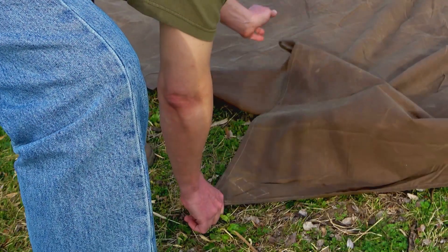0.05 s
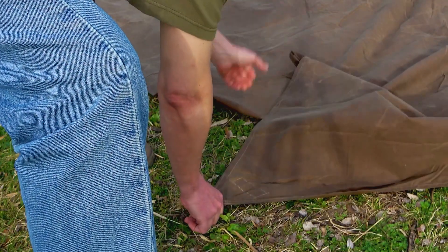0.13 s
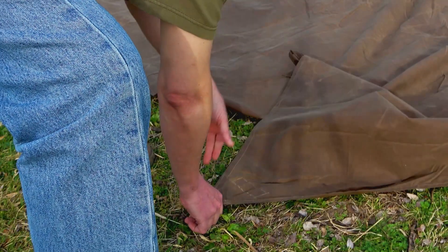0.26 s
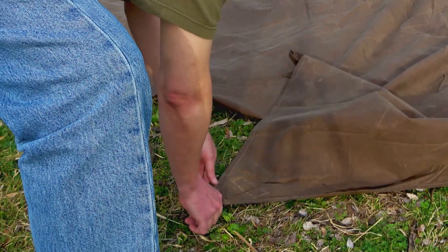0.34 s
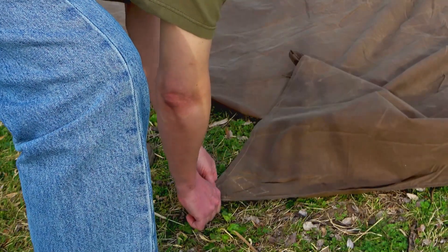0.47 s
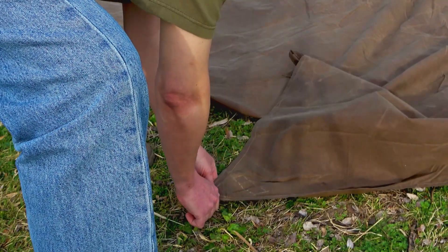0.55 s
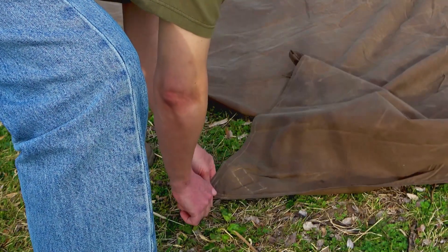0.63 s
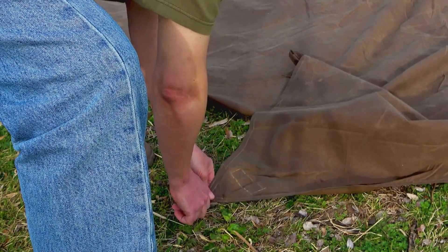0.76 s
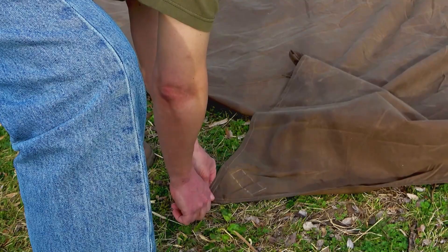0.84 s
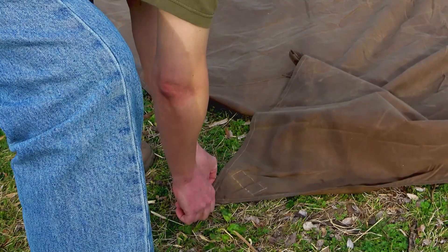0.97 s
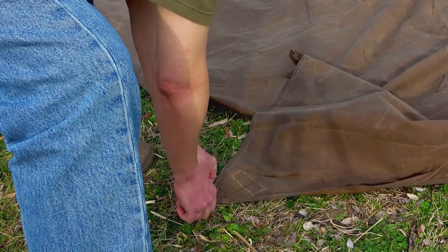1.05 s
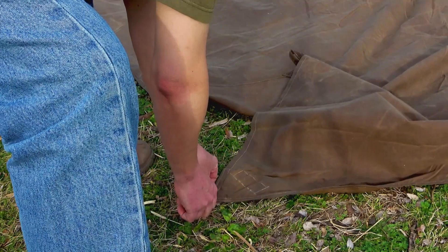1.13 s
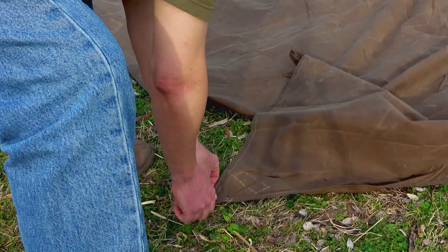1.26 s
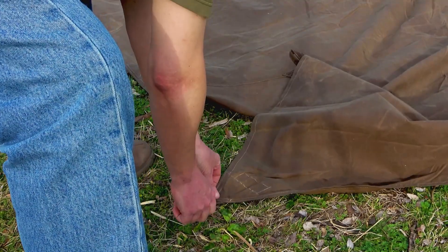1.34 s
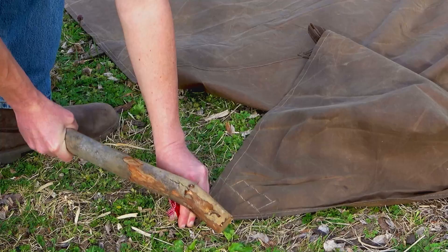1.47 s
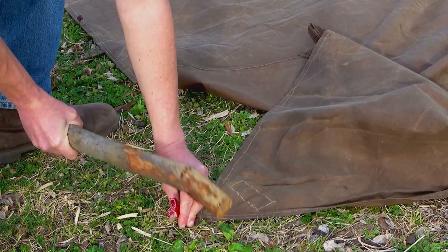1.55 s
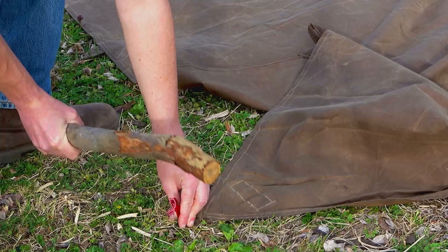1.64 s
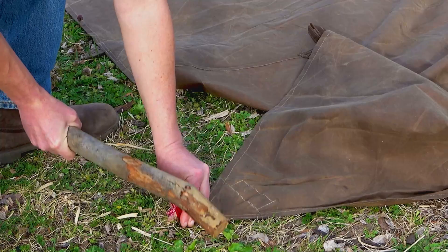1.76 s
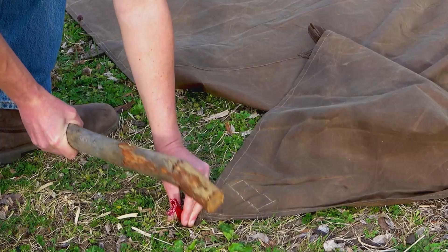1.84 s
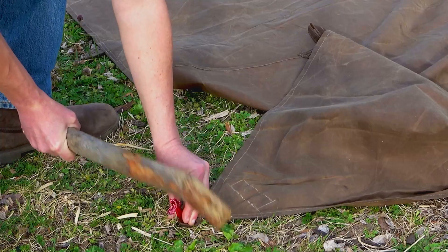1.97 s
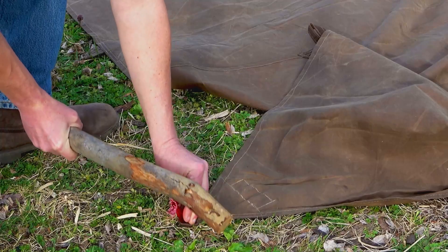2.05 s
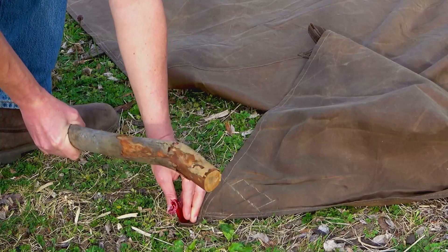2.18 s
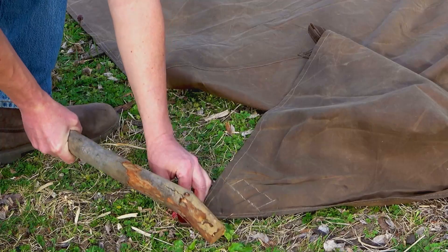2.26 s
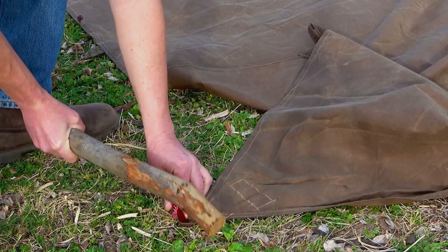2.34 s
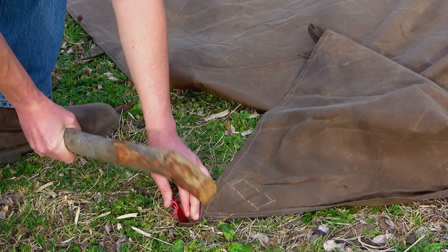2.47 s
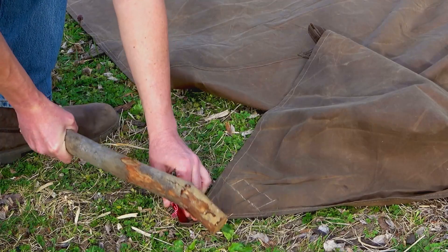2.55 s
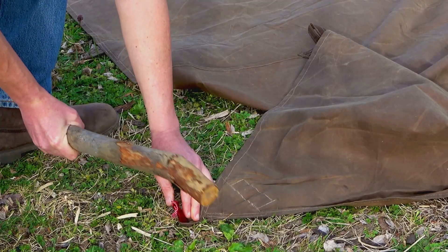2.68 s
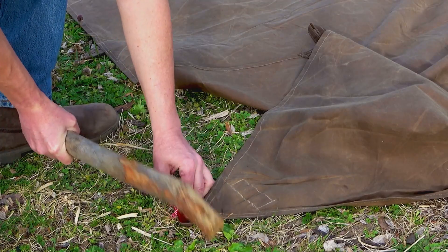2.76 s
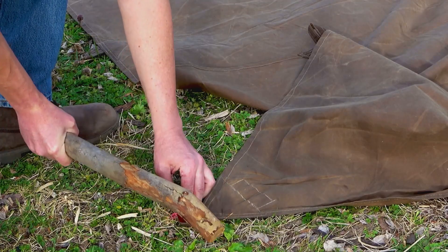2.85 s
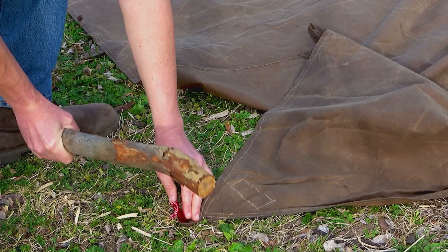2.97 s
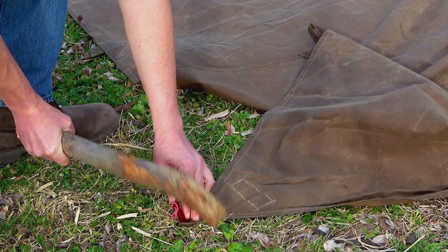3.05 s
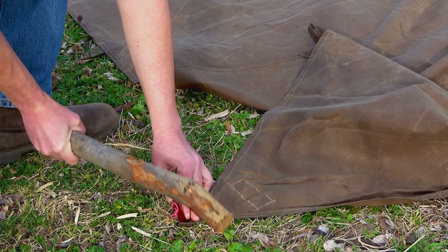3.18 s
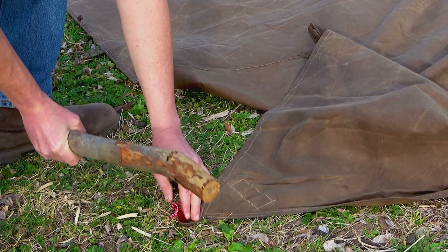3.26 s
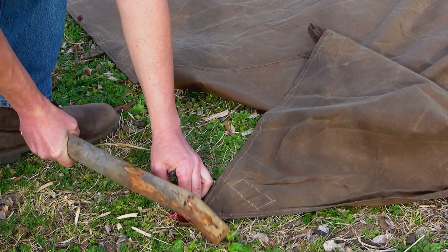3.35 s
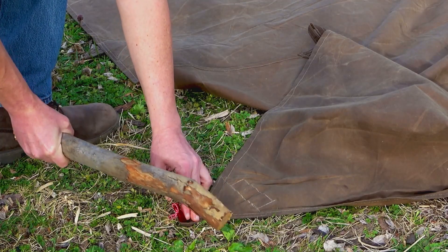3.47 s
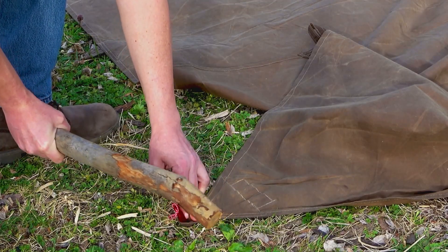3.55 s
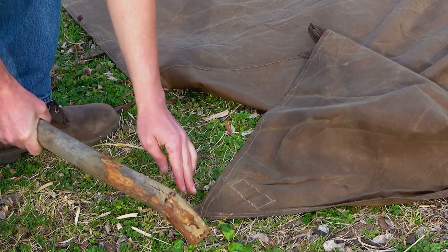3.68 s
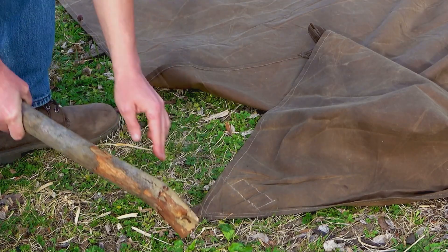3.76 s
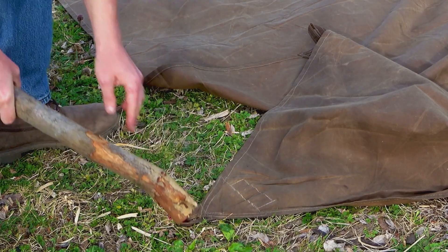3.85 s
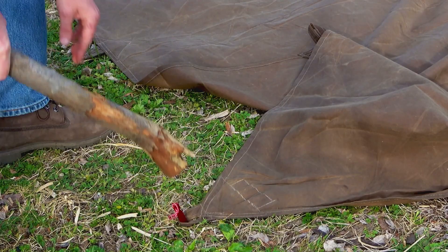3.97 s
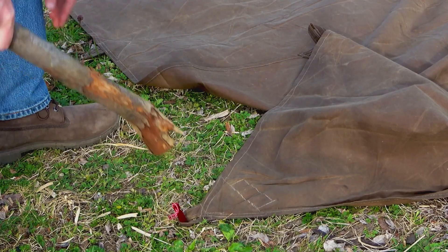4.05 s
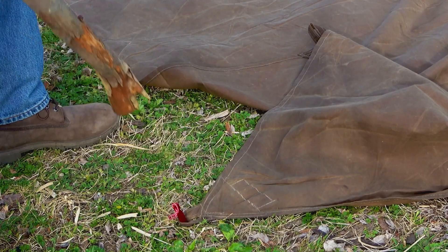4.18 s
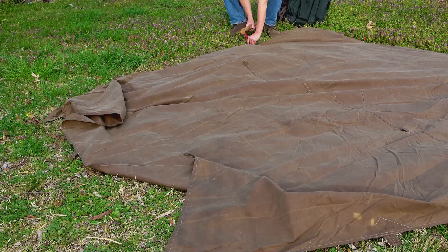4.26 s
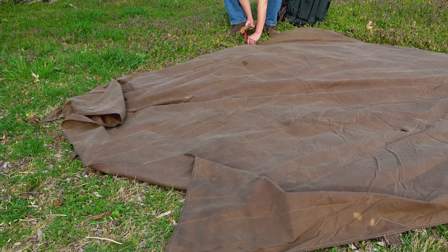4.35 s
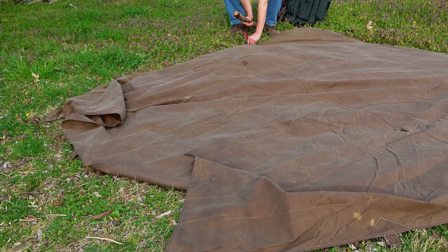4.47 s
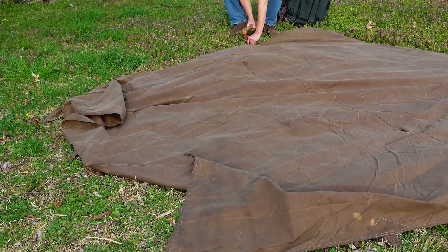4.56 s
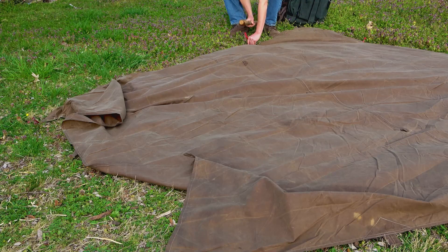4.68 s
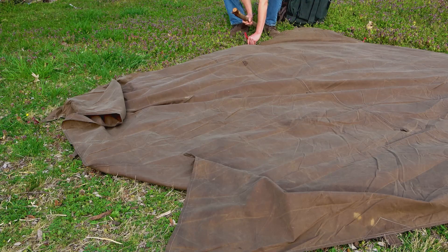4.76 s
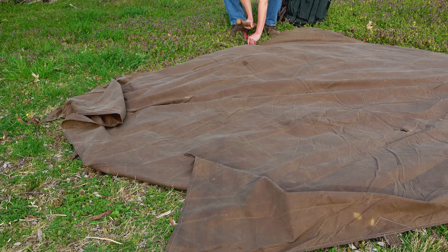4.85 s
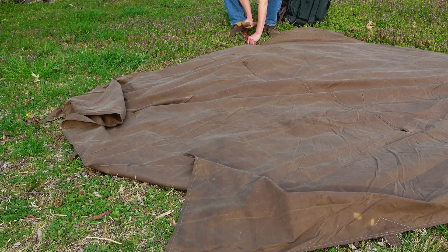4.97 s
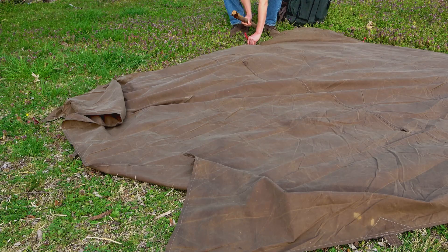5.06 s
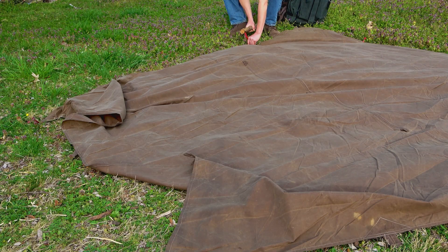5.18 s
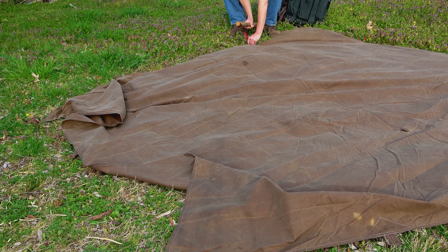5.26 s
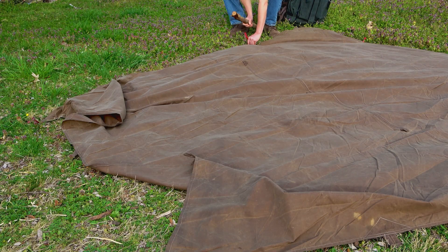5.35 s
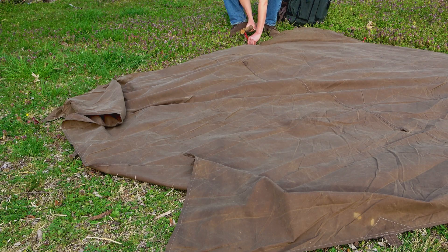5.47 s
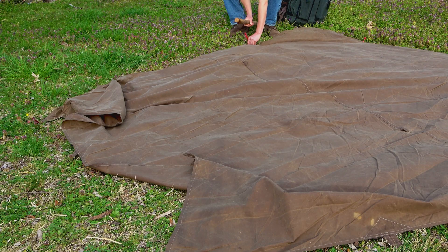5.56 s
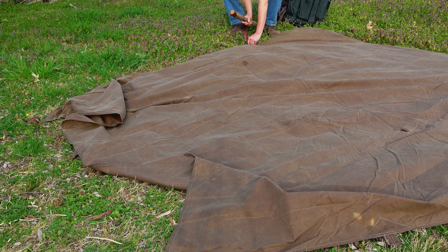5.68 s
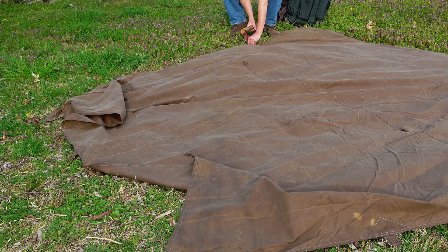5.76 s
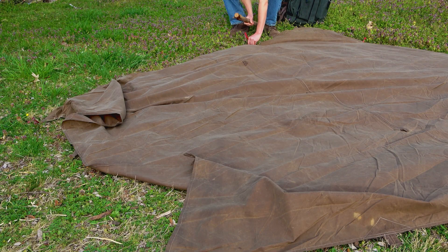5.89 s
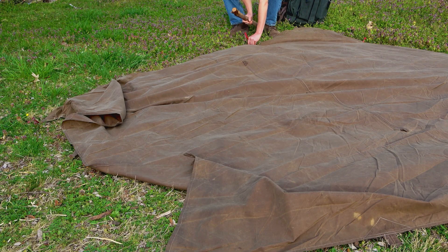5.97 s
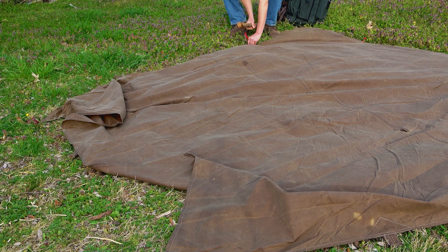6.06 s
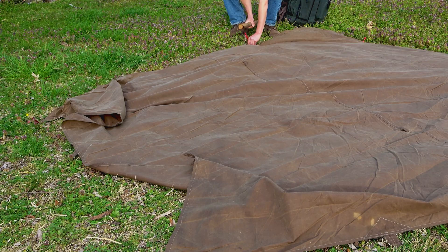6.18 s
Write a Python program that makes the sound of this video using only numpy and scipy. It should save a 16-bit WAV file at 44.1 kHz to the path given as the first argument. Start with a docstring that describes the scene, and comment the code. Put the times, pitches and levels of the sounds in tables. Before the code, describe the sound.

Canvas rustles softly over dry grass, then a wooden stick gives eight ringing knocks on a stake, followed by seven duller thuds, with birds whistling.

```python
"""On a lawn, tent stakes are driven in with a stout wooden stick: eight ringing knocks close by,
then seven dull thuds on a stake farther off. Knocks and thuds are sums of dying sine waves;
short puffs of coloured noise make the ticks and cracks, sparse clicks make the loose grit.
Canvas and dry grass rustle first, as noise in strokes. Songbirds whistle in the trees as gliding
tones with echoes, distant engines hum as wavering tones, and filtered noise makes air and rumble."""
import sys
import numpy as np
from scipy import signal
from scipy.fft import rfft, irfft
from scipy.io import wavfile
from scipy.ndimage import uniform_filter1d

SR = 44100
rng = np.random.default_rng(int(sys.argv[2]) if len(sys.argv) > 2 else 0)


def bounce(signal):
    """Save signal as a 16-bit WAV file at the path given by the first command-line argument."""
    frames = np.transpose(np.atleast_2d(signal))
    limited = np.clip(frames, -1, 1)
    pcm = np.round(limited * 32767).astype(np.int16)
    wavfile.write(sys.argv[1], SR, pcm)


N = 274302
TIME = np.arange(N) / SR  # seconds since the start
AGE = np.arange(SR // 4) / SR  # seconds since a blow
MOVE_S = 4.15  # just before the far blows: the idling engine is gone and the air starts to get quieter


def amp(db):
    """Turns decibels into a gain."""
    return 10 ** (np.asarray(db) / 20)


def unit(x):
    """Scales a signal to an average (rms) level of 1."""
    return x / np.sqrt(np.mean(x ** 2) + 1e-20)


def read(points, hz):
    """Reads a table between its points, on a log-frequency axis."""
    f, value = np.transpose(points)
    return np.interp(np.log(hz + 1), np.log(f + 1), value)


def level(curve):
    """Turns a (time [s], level [dB]) curve into a gain for every sample."""
    return amp(np.interp(TIME, *np.transpose(curve)))


def add(mix, s, sound):
    """Mixes a sound in at time s, cut off where the mix ends."""
    start = max(round(s * SR), 0)
    part = mix[..., start:][..., :sound.shape[-1]]
    part += sound[..., :part.shape[-1]]


def colour(x, spectrum):
    """Filters a signal by a table of frequency and dB, then scales it to rms 1."""
    hz = np.fft.rfftfreq(len(x), 1 / SR)
    return unit(irfft(rfft(x) * amp(read(spectrum, hz)), len(x)))


def noise(spectrum, size):
    """Random noise of a given colour."""
    return colour(rng.standard_normal(size), spectrum)


def decay(t60):
    """A fade that falls 60 dB in t60 seconds."""
    return np.exp(-np.log(1000) * AGE / t60)


def swell(rise):
    """A smooth start: the gain climbs from 0 towards 1, with a time constant of rise seconds."""
    return 1 - np.exp(-AGE / rise)


def burst(spectrum, t60, rise):
    """A dying puff of noise with the energy of 18 ms at rms 1."""
    puff = noise(spectrum, len(AGE)) * decay(t60) * swell(rise) ** 2
    return unit(puff) * np.sqrt(.018 / AGE[-1])


def pan(x, left_db):
    """Places a sound by a level difference between the left and right channels."""
    return x * amp([[left_db / 2], [-left_db / 2]])


def ports(pair, width):
    """Two close microphones: the first signal is shared, a little of the second tells them apart."""
    return pair[0] + width * pair[1] * np.array([[1], [-1]])


def scatter(x, t60s, delay, width):
    """Diffuse outdoor echoes: each band dies at its own speed, and the echo pattern drifts over time."""
    out = np.zeros((2, N))
    for k in range(3):
        hz, t, z = signal.stft(rng.standard_normal((2, SR // 2)), SR, nperseg=256)
        band_decay = np.exp(-np.log(1000) * t / read(t60s, hz)[:, None])
        tail = signal.istft(z * band_decay, SR, nperseg=256)[1]
        tail = np.pad(tail / np.linalg.norm(tail[0]), ((0, 0), (round(delay * SR), 0)))
        share = np.sqrt(2 / 3) * np.cos(np.pi * (TIME + k / 3))  # the three tails take turns
        out += signal.fftconvolve((x * share)[None], tail, axes=1)[:, :N]
    return ports(out, width)


def grains(size, per_s, spread_db):
    """Sparse random clicks of very uneven size."""
    sizes = amp(spread_db * np.minimum(rng.exponential(1, size), 4))
    return rng.standard_normal(size) * sizes * (rng.random(size) < per_s / SR)


def outdoors():
    """Soft air noise and a distant low rumble, both steady noise shaped by slow level curves."""
    # colour of the outdoor air: (frequency [Hz], relative level [dB per Hz])
    air_colour = [(15, -34), (25, -9.5), (49, -1.5), (74, -1.5), (137, 0), (263, -10.5), (416, -14.5),
                  (695, -11.5), (1040, -14), (1840, -21.5), (4370, -32.5), (5570, -41), (12200, -44),
                  (13600, -55.5), (16000, -71)]
    # colour of the rumble: (frequency [Hz], relative level [dB per Hz])
    rumble_colour = [(35, -22.5), (60, -9), (85, 5), (110, 24.5), (150, 29), (210, 8), (330, -27)]
    # how loud the distant rumble is: (time [s], level [dB])
    rumble_curve = [(0, -74), (.5, -70.5), (1.4, -64), (3, -59.5), (3.9, -70.5), (6.2, -75.5)]
    air_curve = [(MOVE_S, -58.5), (MOVE_S + 0.27, -60.5)]  # (time [s], level [dB])
    air = ports([noise(air_colour, N), noise(air_colour, N)], width=0.21) * level(air_curve)
    rumble = ports([noise(rumble_colour, N), noise(rumble_colour, N)], width=0.2) * level(rumble_curve)
    return pan(air + rumble, left_db=-1.05)


def hum(hz, db, octave_db):
    """From far away only an engine's firing rate and its octave are left, both a little unsteady."""
    waver, throb = (unit(uniform_filter1d(row, 4000)) for row in rng.standard_normal((2, len(hz))))
    turn = 2 * np.pi * np.cumsum(hz * (1 + 0.011 * waver)) / SR
    wave = np.sqrt(2) * (np.sin(turn) + amp(octave_db) * np.sin(2 * turn))
    return wave * amp(db + 1.3 * throb) * signal.windows.tukey(len(hz), .03)


def engines():
    """One distant engine settles to an idle and fades, while another speeds up and eases off."""
    idle_hz, idle_start_hz, settle_s = 70.5, 76.7, 0.8
    idle_db, idle_fade_db_per_s = -59, 1.4
    rev_s, rev_length_s, rev_top_s, rev_width_s = 0.18, 1.35, 1.1, .55
    rev_low_hz, rev_top_hz = 56.17, 83.3
    rev_db, rev_ends_db = -55.5, -11  # loudest halfway; the ends are softer by the second value

    settling_hz = idle_hz + (idle_start_hz - idle_hz) * np.exp(-TIME / settle_s)
    idle = hum(settling_hz, idle_db - idle_fade_db_per_s * TIME, octave_db=-12.5)
    out = idle * np.clip((MOVE_S - TIME) * 10, 0, 1)  # gone within a last tenth of a second

    u = np.linspace(0, 1, round(rev_length_s * SR))
    throttle = np.exp(-((rev_s + u * rev_length_s - rev_top_s) / rev_width_s) ** 2)
    rev_hz = rev_low_hz + (rev_top_hz - rev_low_hz) * throttle
    add(out, rev_s, hum(rev_hz, rev_db + rev_ends_db * (2 * u - 1) ** 2, octave_db=-13))
    return pan(out, left_db=-1)


def tone(hz, flutter_db):
    """A bird's near-pure note, wavering in pitch and fluttering on its way through the air."""
    waver, flutter = (unit(uniform_filter1d(uniform_filter1d(row, size=300), size=200))
                      for row in rng.standard_normal((2, len(hz))))
    pitch = hz * (1 + .01 * waver)
    return np.sqrt(2) * np.sin(2 * np.pi * np.cumsum(pitch) / SR) * amp(flutter_db * flutter)


def slur(length, first_hz, last_hz):
    """A short note: a quick slide in pitch that levels out."""
    u = np.linspace(0, 1, round(length * SR))
    hz = last_hz + (first_hz - last_hz) * (1 - u) ** 2
    return tone(hz, flutter_db=6.0) * signal.windows.tukey(len(u), .5)


def whistle(length, first_hz, last_hz, lift_hz, opening_db):
    """One falling song, stretched to a length and to a fall in pitch."""
    # the song every long whistle follows:
    # (share of its length [0-1], share of its fall in log pitch [0-1], relative level [dB])
    song = [(0, 0, -18), (.1, .14, -8), (.24, .27, -5), (.42, .42, -11), (.6, .635, -1), (.72, .82, -4),
            (.85, .945, -9), (1, 1, -16)]
    linger_at, linger_width = .5, .11  # where the pitch is held up, as shares of the whistle
    opening_share = .6  # part of the whistle over which the bird reaches full voice
    u = np.linspace(0, 1, round(length * SR))
    at, fall, db = np.transpose(song)
    hz = first_hz * (last_hz / first_hz) ** np.interp(u, at, fall)
    hz = hz + lift_hz * np.exp(-((u - linger_at) / linger_width) ** 2)
    opening = opening_db * np.maximum(1 - (u / opening_share) ** 2, 0)
    loudness = amp(np.interp(u, at, db) + opening)
    return tone(hz, flutter_db=2.5) * loudness * signal.windows.tukey(len(u), .06)


def birds():
    """Whistles, phrases and chirps are heard directly and as tree echoes; trills only as echoes."""
    # long falling whistles: (time [s], length [s], first pitch [Hz], last pitch [Hz],
    # lift halfway [Hz], level [dB], opening against the rest [dB])
    whistles = [(0.403, 0.47, 4830, 2108, 40, -51, -27.5), (1.275, .395, 5420, 1974, 449.5, -54, 3),
                (3.358, 0.48, 4886, 2107, 169, -52, -2), (4.789, .53, 4800, 2142, 70, -55, -13),
                (5.756, .48, 4776, 2035, 90, -52, -5)]
    # single chirps: (time [s], length [s], first pitch [Hz], last pitch [Hz], level [dB],
    # echo from the trees [dB])
    chirps = [(0.937, 0.13, 2154, 1958, -74.5, -2), (3.96, 0.076, 2130, 2000, -71, 1),
              (4.252, .03, 6250, 4690, -54.5, -11.5), (4.77, 0.074, 6200, 6030, -86, -3),
              (5.86, 0.096, 6070, 6130, -83.5, -5)]
    # distant trills of quick falling notes: (time [s], length [s], top [Hz], bottom [Hz], level [dB])
    trills = [(4.772, 0.24, 4420, 3450, -58.5), (5.268, 0.28, 4330, 3450, -63.5)]
    # a second bird's phrase, two falling slurs and a rising one:
    # (delay [s], length [s], first pitch [Hz], last pitch [Hz], relative level [dB])
    phrase = [(0, 0.064, 4480, 3200, -5), (0.052, .07, 4500, 3080, -3), (.132, .05, 3250, 3570, -12)]
    # when it sings that phrase: (time [s], level [dB], pitch shift [Hz])
    phrase_calls = [(.25, -65, -32), (.955, -67, -2.5), (2.648, -61, -38), (3.586, -54.5, 157)]
    # how long echoes last among the trees: (frequency [Hz], time to fall 60 dB [s])
    trees_t60 = [(2000, 0.34), (5000, 0.37)]
    near, deep = np.zeros((2, N))

    def call(s, sound, echo_db):
        add(near, s, sound)
        add(deep, s, amp(echo_db) * sound)

    for s, length, first_hz, last_hz, lift_hz, db, opening_db in whistles:
        call(s, amp(db) * whistle(length, first_hz, last_hz, lift_hz, opening_db), echo_db=-5)
    for s, db, shift_hz in phrase_calls:
        for delay, length, first_hz, last_hz, note_db in phrase:
            note = slur(length, first_hz + shift_hz, last_hz + shift_hz)
            call(s + delay, amp(db + note_db) * note, echo_db=-1)
    for s, length, first_hz, last_hz, db, echo_db in chirps:
        call(s, amp(db) * slur(length, first_hz, last_hz), echo_db)
    for s, length, top_hz, bottom_hz, db in trills:
        fall = (np.arange(0, length, 1 / SR) * 28) % 1  # progress through each note, 28 notes a second
        notes = tone(top_hz + (bottom_hz - top_hz) * fall, flutter_db=3) * np.sqrt(np.sin(np.pi * fall))
        add(deep, s, amp(db) * notes * signal.windows.tukey(len(fall), .9))
    return pan(near, left_db=1) + scatter(deep, trees_t60, delay=0.0051, width=0.29)


def handling():
    """Hands pull canvas over dry grass (crackling strokes) and set the stake (soft bumps)."""
    # strokes of canvas over grass: (time of the peak [s], level [dB])
    rustles = [(.01, -71), (.16, -69.5), (.58, -73), (.745, -60), (1.04, -77), (1.19, -71), (1.299, -74.5)]
    # colour of the rustle: (frequency [Hz], relative level [dB per Hz])
    rustle_colour = [(400, -6.5), (1500, 14.5), (5500, 5), (8000, -6), (12000, -6.5), (15500, -17)]
    # light handling noises: (time [s], centre [Hz], level [dB], time to fall 60 dB [s])
    bumps = [(0.133, 665, -58, 0.11), (0.925, 173, -57.5, 0.15), (4.211, 1650, -51, 0.15)]
    rise_db_per_s, fall_db_per_s = 218, 150
    strokes = np.zeros(N)
    for s, db in rustles:
        drop_db = np.maximum((s - TIME) * rise_db_per_s, (TIME - s) * fall_db_per_s)
        strokes += amp(db - drop_db)
    fibres = [colour(grains(N, per_s=4000, spread_db=1.5), rustle_colour) for _ in range(2)]
    out = ports(fibres, width=0.22) * strokes
    for s, hz, db, t60 in bumps:
        bump_colour = [(hz / 3, -30), (hz * .8, 0), (hz * 1.25, 0), (hz * 8, -80)]
        add(out, s, amp(db) * burst(bump_colour, t60, rise=.0007))
    return pan(out, left_db=2.0)


def ring(mode, rise):
    """One damped mode, swelling while the stick presses on the stake."""
    hz, db, t60, direction = mode
    swing = np.sign(direction) * amp(db) * np.sin(2 * np.pi * hz * AGE) * decay(t60) * swell(rise)
    return signal.sosfilt(signal.butter(4, 4200, fs=SR, output="sos"), swing)


def grip(after_s, db):
    """The hands choke the ring as the stick rebounds: around after_s the gain drops to db."""
    return amp(db) + (1 - amp(db)) * np.exp(-(AGE / after_s) ** 4)


def tick(db, t60, rise):
    """First touch of the stick: the sharper (louder) it is, the higher it reaches."""
    # colour of the tick: (frequency [Hz], relative level [dB per Hz])
    tick_colour = [(2500, -28.5), (4400, -7), (5400, -8.5), (7200, -2.5), (9500, -5.5), (12000, -9.5),
                   (15000, -21.5)]
    # a tick of -45.5 dB reaches 14350 Hz, and each dB more adds 182 Hz
    top_hz = np.clip(14350 + 182 * (db + 45.5), SR / 8, SR / 2.2)
    lowpass = signal.butter(6, top_hz, fs=SR, output="sos")
    return amp(db) * signal.sosfilt(lowpass, burst(tick_colour, t60, rise))


def grit(t60, rise):
    """Soil and dry blades crackle as the stake slips deeper."""
    # colour of the grit: (frequency [Hz], relative level [dB per Hz])
    grit_colour = [(1500, -8.5), (3500, -6.5), (5500, -13.5), (8000, -13.5), (12000, -19.5), (15500, -29)]
    crackle = grains(len(AGE), per_s=5000, spread_db=2.5)
    return colour(crackle, grit_colour) * decay(t60) * swell(rise)


def far_stake():
    """The turf takes the blow with a low thud; the wood only clacks briefly."""
    # blows: (time [s], ground thump [dB], soil firmness [dB per octave], lowest turf mode [Hz],
    # wooden clack [dB], crack [dB], tick [dB], relative grit [dB], left-right difference [dB])
    thuds = [(4.351, -3, -3.5, 151.5, -45, -59.5, -47.5, -67.5, -1.7),
             (4.643, -1.5, 0, 154.2, -41.5, -51.5, -50.5, -65, -4),
             (4.9445, 1, -1.5, 155.3, -52, -45, -48, -63.5, -1.5),
             (5.244, 0.5, 2, 151, -50, -47.5, -53, -64.5, -4),
             (5.5254, 0.9, 2.5, 149, -52.5, -75.5, -57, -69, -3),
             (5.8346, 1.5, 0, 150.6, -49, -41, -61.5, -69, -3.6),
             (6.1697, 2.5, 2, 153, -41, -44.5, -55, -69, -1.7)]
    # turf modes, retuned by each blow's lowest mode:
    # (frequency [Hz], relative level [dB], time to fall 60 dB [s], direction of first swing [+1 or -1])
    turf_modes = [(151.5, -21, 0.074, 1), (194.5, -30, 0.09, -1), (275.7, -16, 0.031, -1),
                  (403.3, -26.5, 0.029, 1)]
    # colour of the crack: (frequency [Hz], relative level [dB per Hz])
    crack_colour = [(1500, -3.5), (2000, -1), (2450, 8), (3200, -9.5), (3950, -8.5), (4700, -23),
                    (6000, -30)]
    # colour of the clack: (frequency [Hz], relative level [dB per Hz])
    clack_colour = [(400, -43), (600, 1), (720, -4.5), (950, 6.5), (1200, -2), (1420, 0), (1750, -25),
                    (2400, -53)]
    out = np.zeros((2, N))
    choke = grip(after_s=0.021, db=-6)
    for s, thump_db, firm_db, lowest_hz, clack_db, crack_db, tick_db, grit_db, left_db in thuds:
        pitch = lowest_hz / turf_modes[0][0]
        thud = np.zeros(len(AGE))
        for hz, *rest in turf_modes:
            firmness = amp(firm_db * np.log2(hz / 200))  # firm soil favours the higher modes
            thud += firmness * ring((hz * pitch, *rest), rise=0.00048)
        add(out, s, pan(amp(thump_db) * thud * choke, left_db))
        clack = amp(clack_db) * burst(clack_colour, t60=0.11, rise=0.000078)
        crack = amp(crack_db) * burst(crack_colour, t60=0.044, rise=0.00037)
        touch = tick(tick_db, t60=.012, rise=.0015)
        add(out, s - .001, pan(clack, left_db=-2.2) + crack + touch)
        loose = [grit(t60=0.19, rise=0.0043) for _ in range(2)]
        add(out, s, amp(grit_db + 13.5) * ports(loose, width=0.44))
    return out


def near_stake():
    """A tick at first touch, then the stick rings: its two close bending modes beat against each other."""
    # blows: (time [s], ring [dB], ground thump [dB], relative hardness of contact [dB], tick [dB],
    # relative grit [dB], left-right difference of the ring [dB])
    knocks = [(1.5069, 1, -1.5, -7, -67, -77.5, 3), (1.7943, 1.5, -1.5, -11, -59, -73.5, 2.5),
              (2.0737, 2, -0.5, -16.5, -74, -87, 2.5), (2.338, 0.1, -2, -6, -59.5, -75, 3),
              (2.6024, -4, 2, 14.5, -39.5, -67.5, 2.5), (2.8698, -0.8, -2.5, 1, -59.5, -75, 4),
              (3.14, -0.5, -1.5, 7.5, -45, -66, -2), (3.4223, -1.5, -1.5, 6, -57, -70, 3.5)]
    # stick on the stake; modes below 700 Hz shift a little with each blow:
    # (frequency [Hz], relative level [dB], time to fall 60 dB [s], direction of first swing [+1 or -1])
    stick_modes = [(143.3, -29.5, 0.11, 1), (231, -23.5, 0.043, -1), (401, -26, .031, -1),
                   (564, -31, 0.087, 1), (789, -25, 0.021, 1), (1279.3, -13.5, 0.052, -1),
                   (1386, -17, 0.063, -1), (1428, -4.5, 0.011, 1), (1704, -15.5, 0.0069, 1),
                   (2308, -27.5, 0.025, -1), (2543, -19.5, 0.013, 1), (3500, -26, 0.012, 1)]
    # colour of the crack: (frequency [Hz], relative level [dB per Hz])
    crack_colour = [(1200, -8.5), (1900, -5), (2550, -5.5), (3050, -2), (3550, -2), (4300, -21.5),
                    (5500, -58.5)]
    spot_spread_db = 1.5  # each blow lands on another spot and weights the upper modes differently
    out = np.zeros((2, N))
    choke = grip(after_s=0.035, db=-13.5)
    for s, ring_db, thump_db, hard_db, tick_db, grit_db, left_db in knocks:
        soil = 1 + 0.046 * rng.standard_normal()  # the ground gives a little differently each time
        for hz, *rest in stick_modes:
            if hz < 700:
                thump = amp(thump_db) * ring((hz * soil, *rest), rise=0.00057)
                add(out, s, pan(thump, left_db=1.5))
            else:
                reach = np.clip((hz - 2100) / 1400, 0, 1)  # contact hardness sets only the top modes
                spot_db = spot_spread_db * rng.standard_normal() * (hz > 1600)
                gain = amp(ring_db + reach * hard_db + spot_db)
                add(out, s, pan(gain * ring((hz, *rest), rise=0.00063) * choke, left_db))
        crack = amp(hard_db - 49.5) * burst(crack_colour, t60=0.03, rise=0.00036)
        touch = tick(tick_db, t60=0.016, rise=0.00028)
        add(out, s - .0007, pan(crack + touch, left_db=4.2))
        jerk = amp(tick_db - 14.0) * grit(t60=0.028, rise=0.00094)  # the stake jerks down
        add(out, s + 0.0042, pan(jerk, left_db=2.5))
        loose = [grit(t60=0.18, rise=0.0066) for _ in range(2)]
        add(out, s, amp(grit_db + 16) * ports(loose, width=.3))
    return out


def scene():
    """Both stakes with the faint echo of the yard, among birds, handling, engines and air."""
    # how long echoes last in the yard: (frequency [Hz], time to fall 60 dB [s])
    yard_t60 = [(150, 0.2), (500, 0.2), (1400, 0.15), (2600, 0.15), (10000, 0.066)]
    near, far = near_stake(), far_stake()
    sent = amp(-17) * near.mean(0) + amp(-21.5) * far.mean(0)
    middle = signal.sosfilt(signal.butter(1, [1000, 1800], "bandpass", fs=SR, output="sos"), sent)
    swallowed = sent - 0.68 * middle  # the lawn swallows some of the midrange
    echoes = scatter(swallowed, yard_t60, delay=.01, width=0.16)
    return outdoors() + engines() + birds() + handling() + echoes + far + near


def record(dry):
    """Limits the band: a steep lowpass takes away what lies above 15.7 kHz."""
    lowpass = signal.firwin(511, 15700, window=("kaiser", 9), fs=SR)
    return signal.oaconvolve(dry, lowpass[None], "same")


dry = scene()
out = record(dry)
bounce(out)
```